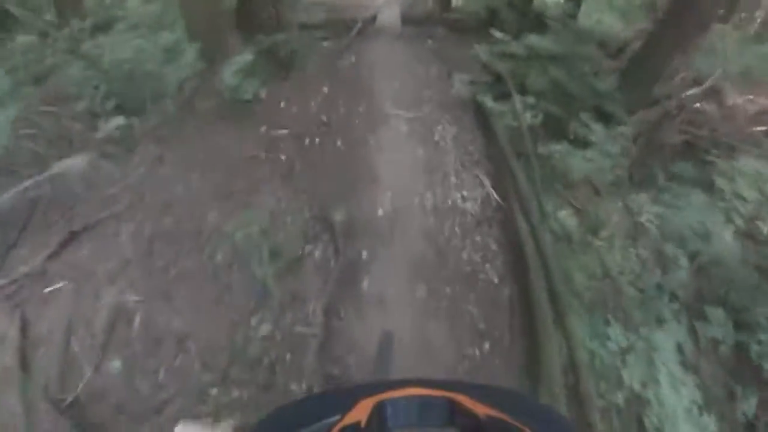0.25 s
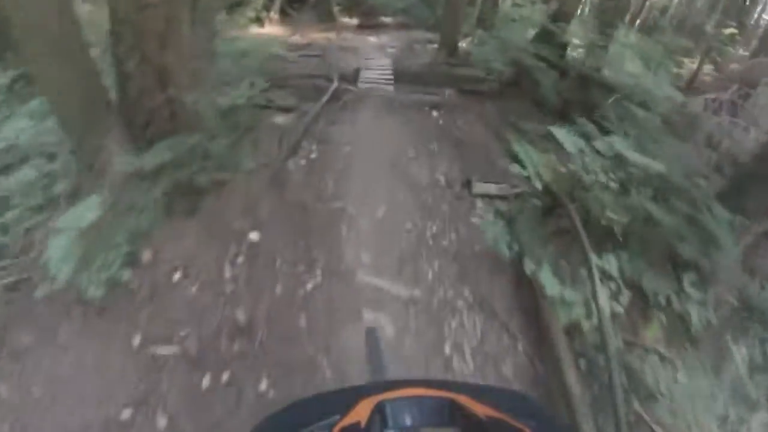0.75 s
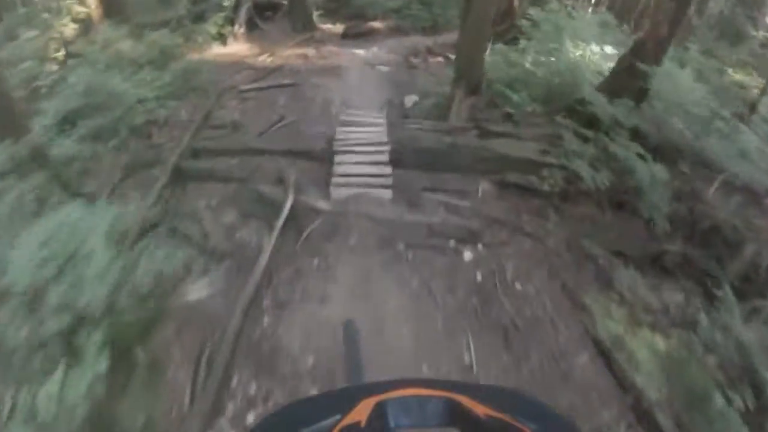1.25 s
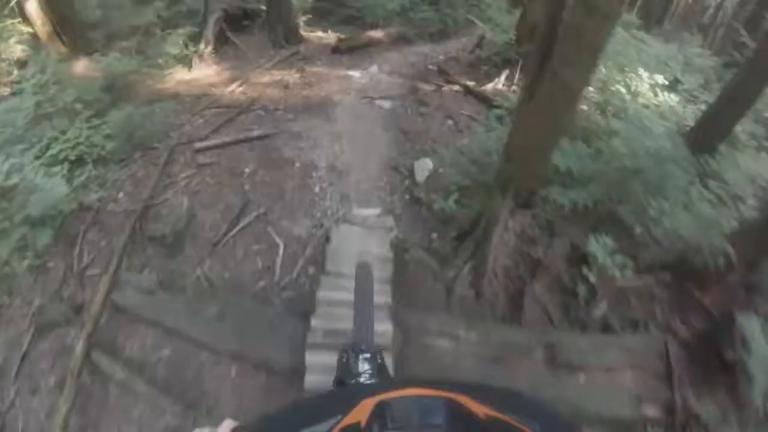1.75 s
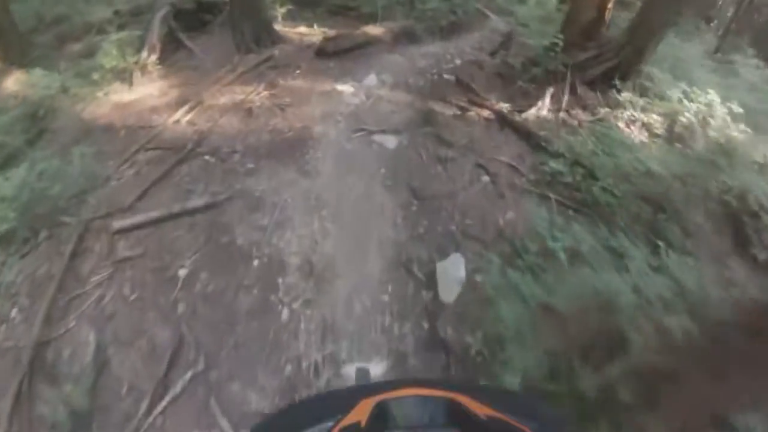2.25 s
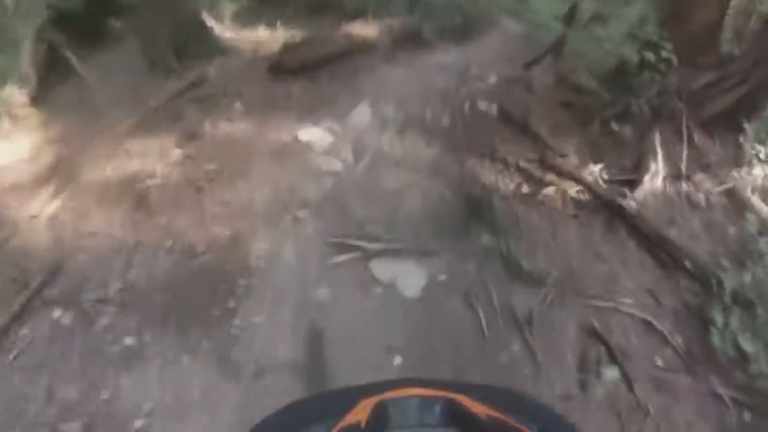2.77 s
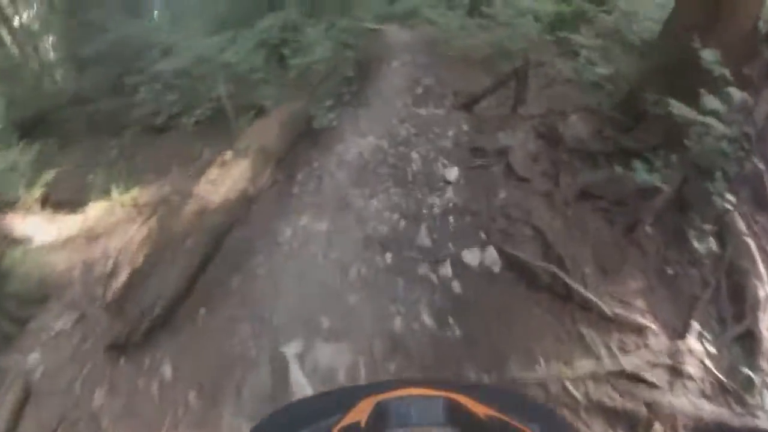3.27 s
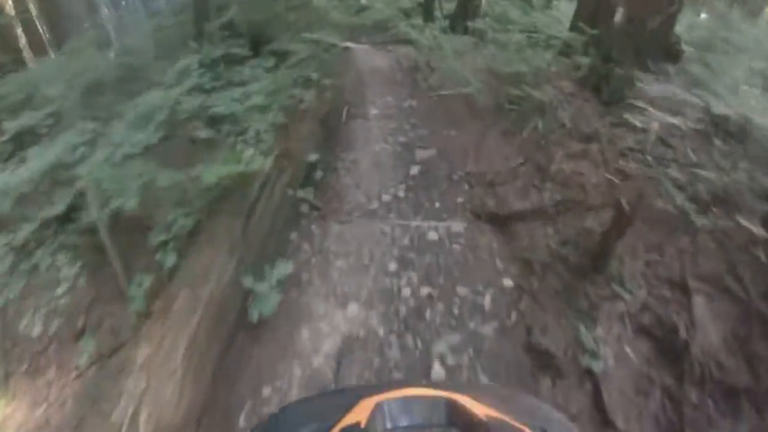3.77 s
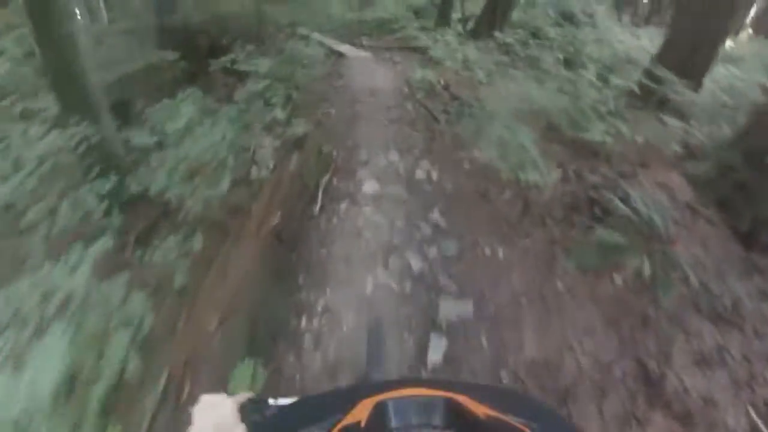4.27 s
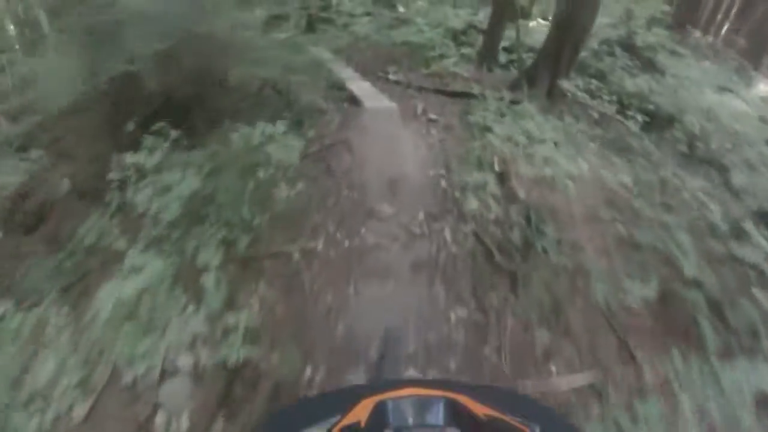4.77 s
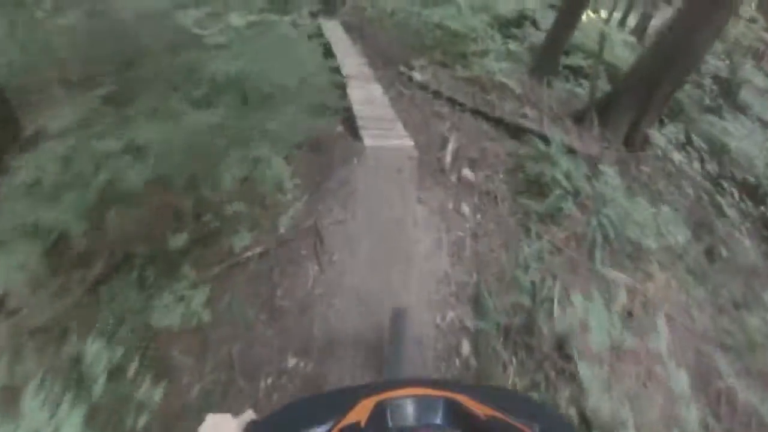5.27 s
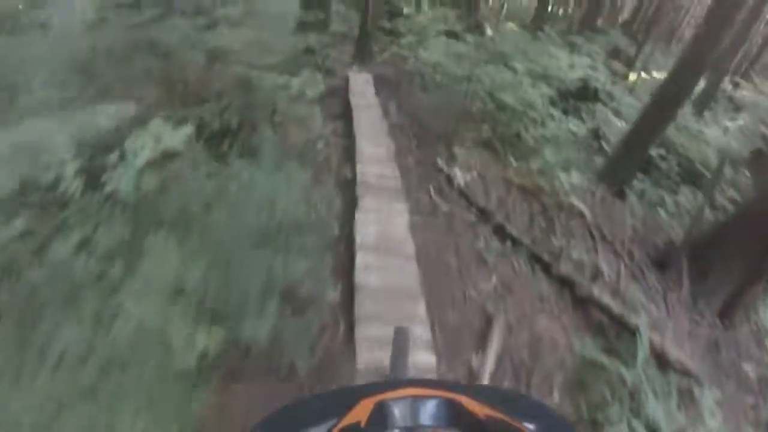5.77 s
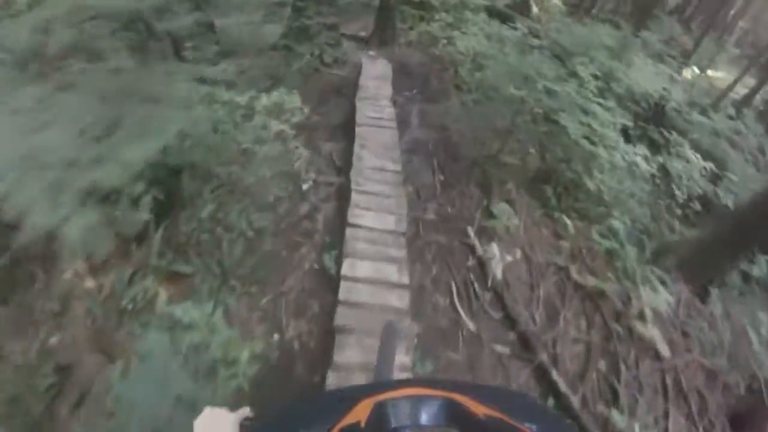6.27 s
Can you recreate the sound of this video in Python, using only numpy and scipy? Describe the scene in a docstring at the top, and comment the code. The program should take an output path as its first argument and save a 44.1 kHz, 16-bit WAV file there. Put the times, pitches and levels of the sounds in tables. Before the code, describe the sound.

Heard from a rider-mounted camera in a closed case, a mountain bike runs down a forest trail. Deep wind buffeting and soft hiss continue throughout. Early bumps thud dully with chain slaps and small ticks, then it calms over planks. A hard landing cracks sharply against the case, followed by a rattling burst of thumps and gritty tyre crunch, before quieter rolling with muffled knocks.

```python
"""A forest trail, ridden downhill on a mountain bike; one microphone in a closed camera case on the rider.
Behind the ride lie steady hiss and a faint whine, then filtered-noise wind that buffets the microphone.
Just below, tyres crunch as banded showers of tiny impacts; the chain slaps and small parts tick as noise bursts.
Closest, roots and rocks thump the springy mount as decaying cosines with a clunk of the frame,
and one hard landing cracks against the case, whose modes ring as decaying sines."""
import sys
import numpy as np
from scipy import signal
from scipy.fft import rfft, irfft, next_fast_len
from scipy.io import wavfile
from scipy.ndimage import uniform_filter1d

SR = 44100
rng = np.random.default_rng(int(sys.argv[2]) if len(sys.argv) > 2 else 0)


def put_to_file(sound):
    """Save the sound as 16-bit audio at rate SR, in the file named by the first command-line argument."""
    columns = np.atleast_2d(sound).T  # one column per channel
    safe = np.clip(columns, -1, 1)
    whole_steps = np.round(safe * 32767)
    wavfile.write(sys.argv[1], SR, whole_steps.astype(np.int16))


N = 287973
T = np.arange(N) / SR  # time [s]

# Levels in the tables are relative: each layer's filter and mix gain still follow.
# colour of the electronic hiss: (frequency [Hz], level [dB])
HISS_COLOUR = [(100, 16), (300, 15.5), (800, 7.5), (1700, 1), (3000, 3.5), (5000, 0), (6800, -1.5),
               (7200, 0.5), (7700, -2.5), (10500, -2.5), (12500, -5), (13300, -24.5), (16000, -24)]
# the ride between jolts: (time [s], wind buffeting [dB], trembling of the mount [dB])
RIDE = [(0, -39.5, -60), (.6, -44.5, -49), (.9, -55.5, -69.5), (1.25, -45.5, -67.5), (1.55, -51.5, -71),
        (2.05, -43, -73), (2.4, -43.5, -73.5), (2.6, -38, -52), (2.85, -36, -42), (3.06, -53.5, -60),
        (3.36, -38.5, -62.5), (3.75, -45, -65.5), (4.1, -59.5, -76.5), (4.5, -39.5, -65.5), (5.1, -45, -74),
        (5.75, -51, -74), (6.02, -58.5, -79), (6.53, -52, -73)]
# gusts that break into a rough flutter at the microphone: (time [s], flutter level [dB], half length [s])
GUSTS = [(0.295, -65.5, 0.055), (0.469, -61.5, 0.038), (0.546, -63.5, 0.011), (1.176, -76, 0.067),
         (1.731, -75.5, .035), (2.408, -69, 0.034), (2.517, -58.5, .02), (2.751, -59, 0.018),
         (2.865, -59.5, 0.032), (3.197, -75.5, 0.038), (3.437, -62, 0.012), (3.6, -69.5, 0.035),
         (4.475, -63, 0.026), (4.804, -65.5, 0.023), (5.797, -75.5, 0.021)]
# colours of the wind, the gust flutter and the trembling mount: (frequency [Hz], level [dB])
WIND_COLOUR = [(5, -7), (13, 3.5), (20, -3), (35, -14), (55, -21), (100, -34.5), (200, -52), (500, -68),
               (1500, -91.5)]
GUST_COLOUR = [(90, -10.5), (170, 9.5), (300, -2.5), (500, -5), (800, -8.5), (1050, -14), (2500, -23),
               (6000, -73)]
SHAKE_COLOUR = [(30, -17), (65, -5.5), (85, 11.5), (120, -11.5), (170, -22), (300, -33.5), (600, -40),
                (1000, -53.5), (3000, -77.5)]
# the ground under the tyres: (time [s], crunch level [dB])
GROUND = [(0, -76.5), (.3, -80), (.62, -77), (.85, -83.5), (1.3, -81), (2.38, -85.5), (2.5, -75),
          (2.76, -69), (2.9, -68), (3.04, -83), (3.42, -78.5), (3.6, -83.5), (3.98, -81), (4.18, -88),
          (4.4, -73), (4.76, -79), (5.05, -81), (5.65, -81), (6.25, -88), (6.53, -89.5)]
# colour of the tyre crunch: (frequency [Hz], level [dB])
TYRE_COLOUR = [(150, -10), (500, -10), (900, -1), (1150, -2.5), (1370, 4), (1700, -8.5), (2020, 2.5),
               (2350, 4.5), (2650, -2.5), (2850, -15.5), (3600, -18.5), (6000, -28), (12000, -47.5)]
# chain slaps and stones against the frame: (time [s], level [dB], pitch [Hz])
SLAPS = [(0.0569, -55.5, 2220), (0.1185, -58.5, 1300), (0.225, -54.5, 2010), (0.299, -62.5, 1290),
         (0.416, -59, 1940), (0.4478, -52.5, 1400), (0.595, -58, 2180), (0.69, -62, 2310),
         (1.0216, -54, 1540), (1.0898, -48, 1320), (1.2972, -60, 2630), (1.966, -57.5, 1360),
         (2.0804, -62.5, 1350), (2.1666, -65, 1240), (2.354, -59.5, 1490), (2.463, -61, 1370),
         (2.6894, -52.5, 1930), (2.721, -59, 1750), (2.7399, -47.5, 1830), (2.8452, -39, 1840),
         (2.9073, -58, 2240), (3.3204, -57.5, 1360), (3.439, -61, 1473), (3.574, -53.5, 1500),
         (3.8838, -55, 1840), (4.3345, -62.5, 1280), (4.424, -63, 1204), (4.659, -66.5, 2370),
         (5.2048, -59.5, 1300), (5.501, -60, 1400), (5.7363, -58, 2360), (5.9896, -66, 2270)]
# ticks of small loose parts: (time [s], level [dB])
TICKS = [(0.046, -59), (0.211, -58), (0.2803, -52.5), (0.4538, -55), (0.5194, -56.5), (0.5837, -63.5),
         (0.6976, -62.5), (0.771, -65.5), (1.3336, -62), (2.359, -57.5), (2.3997, -55), (2.4306, -60),
         (2.459, -66), (2.5414, -56.5), (2.6325, -51.5), (2.676, -64), (2.729, -54), (2.789, -54),
         (2.834, -58), (2.8968, -60), (2.9377, -62.5), (2.9835, -53), (3.3985, -59), (3.566, -60),
         (4.4321, -53.5), (4.4754, -59), (4.501, -63), (4.5872, -61), (5.4241, -60.5), (5.8436, -65),
         (6.4679, -63)]
# colours of the slaps and the ticks: (frequency [Hz], level [dB])
SLAP_COLOUR = [(300, -16), (750, -6.5), (1250, 3), (1650, -6.5), (2000, 1), (2550, 2), (2900, -15.5),
               (5000, -26), (12000, -37.5)]
TICK_COLOUR = [(1000, -17), (2800, -7.5), (3600, -1), (5000, -6.5), (5800, -5), (6550, 4), (7300, -9.5),
               (8100, -2), (9000, -6), (10300, 1), (12500, -15), (15000, -28.5)]
# hard blows on the case: (time [s], level [dB])
CRACKS = [(2.486, -38), (2.5029, 0), (2.512, -34), (2.52, -37)]
# modes of the case, and the ping of a metal fitting: (frequency [Hz], level [dB], 60 dB decay [s])
CASE_MODES = [(840, -28, .02), (1110, -13, .022), (1310, -7.5, 0.0067), (1653, -14, 0.017),
              (2250, -19.5, 0.024), (2590, -27.5, 0.027), (3150, -33, .015), (3450, -41, 0.028),
              (4320, -26, 0.018), (4740, -30.5, 0.019), (5430, -33.5, 0.01), (6350, -39.5, .012),
              (7200, -27, .007), (8700, -52, .005), (10300, -44, 0.0072)]
PING_MODES = [(4380, -46, .12), (4603, -50, .08), (4727, -54, .075)]
# jolts of the mount by roots, rocks and planks: (time [s], swing level [dB], contact time [ms])
JOLTS = [(0.024, -32.5, 2.66), (0.169, -44.5, 5.6), (0.208, -44, 3.7), (0.2622, -29, 1.9),
         (0.4413, -33.5, 1.56), (0.525, -36, 7.8), (0.63, -34, 8.6), (0.811, -50, 6.9), (1.088, -46.5, 2.9),
         (1.339, -44.5, 7.2), (1.876, -43.5, 4.7), (1.98, -52.5, 4.6), (2.363, -41, 2.45),
         (2.486, -32, 3.7), (2.503, -17, 8.7), (2.5172, -14, 2.13), (2.624, -33, 4.7), (2.6555, -32.5, 2.1),
         (2.742, -31, 3.8), (2.794, -41, 2.4), (2.8228, -20, 1.4), (2.846, -25, 3.45),
         (2.9294, -22.5, 2.03), (3.356, -45, 8.2), (3.436, -47, 3.8), (3.559, -43.5, 1.7),
         (3.58, -41.5, 4.2), (4.401, -45.5, 8.9), (4.465, -39.5, 3.1), (4.603, -45.5, 7), (4.665, -49, 5.8),
         (4.789, -34.5, 6.5), (5.098, -46, 8.5), (5.212, -45.5, 6.1), (5.421, -44.5, 3.7), (5.50, -51, 5),
         (5.587, -47.5, 8.3), (5.838, -48, 7)]
# swings of the mount and, slowest, of the rider's body: (frequency [Hz], level [dB], 60 dB decay [s])
MOUNT_MODES = [(82, 4, 0.17), (114, -18.5, 0.015), (30.4, -15.5, .13)]
# colour of the frame's clunk: (frequency [Hz], level [dB])
CLUNK_COLOUR = [(90, -19.5), (170, -3), (350, -0.5), (600, -3.5), (750, -20), (950, -17.5), (1500, -28.5),
                (2400, -31.5), (2900, -38), (3550, -30), (4300, -42), (7000, -52), (12000, -68)]

WHINE_HZ, TOP_HZ = 3596, 15500
GUST_PRESSURE_DB = 35  # slow pressure over flutter
LOAD_RISE_S, LOAD_FALL_S = .057, .065  # load on the bike builds before each jolt and eases after it
LOAD_GROWTH = .6  # dB of load per dB of swing
LOAD_WIND_DB, LOAD_SHAKE_DB, LOAD_CRUNCH_DB = -21, -26.5, -62  # what a load of 1 adds
GRIT_DB, GRIT_FROM_DB, GRIT_GROWTH = -83.5, -68, 1.2  # grit at a given crunch; dB of grit per dB of crunch
CLUNK_DB, CLUNK_DB_PER_DOUBLING = 15, -7.5  # over swing at 1 ms contact; change per doubling of contact


def undb(db):
    """Decibels to gain."""
    return 10 ** (np.asarray(db) / 20)


def unit(x):
    """Scale to rms 1."""
    return x / np.sqrt(np.mean(x ** 2))


def curve(table, axis=1):
    """One column of a table, joined by straight lines in time."""
    rows = np.array(table)
    return np.interp(T, rows[:, 0], rows[:, axis])


def fade(t, t60):
    """Free decay, 60 dB down after t60 seconds."""
    return np.exp(-np.log(1000) * t / t60)


def swell(s, db, half):
    """A smooth rise and fall around time s, down to 1/e after half seconds either way."""
    return undb(db) * np.exp(-((T - s) / half) ** 2)


def add(track, s, sound):
    """Mix a sound into the track from time s on."""
    start = max(int(s * SR), 0)
    part = track[start:start + len(sound)]
    part += sound[:len(part)]


def band(x, low_hz, high_hz):
    """Band-pass between two edges."""
    edges = [low_hz, min(high_hz, SR / 2 - 1)]
    return signal.sosfilt(signal.butter(2, edges, "band", fs=SR, output="sos"), x)


def colour(x, points):
    """Causal minimum-phase filter through (Hz, dB) points; white noise keeps its power."""
    size = 2 * next_fast_len(N // 2 + SR)
    hz, db = np.transpose(points)
    bin_hz = np.arange(size // 2 + 1) * SR / size
    gain = unit(undb(np.interp(np.log(bin_hz + 1), np.log(hz), db)))
    # folding the cepstrum to positive times makes the filter causal
    cepstrum = irfft(np.log(gain))[:size // 2]
    cepstrum[0] /= 2
    response = np.exp(rfft(2 * cepstrum, size))
    return irfft(rfft(x, size) * response)[:N]


def noise(points):
    """Coloured noise of rms 1."""
    return unit(colour(rng.standard_normal(N), points))


def steady(x, size):
    """Even out the slow swells of a noise over size samples."""
    power = uniform_filter1d(uniform_filter1d(x ** 2, size), size)
    return x / np.sqrt(power + 1e-9)


def walk(rate):
    """Random levels held 1 / rate seconds and smoothed twice; rms 1."""
    k = int(SR / rate)
    steps = np.repeat(rng.standard_normal(N // k + 1), k)
    return unit(uniform_filter1d(uniform_filter1d(steps, k), k)[:N])


def grains(rate, spread_db):
    """Random tiny impacts, rate a second on average, their sizes spread by an exponential draw; rms 1."""
    hit = rng.random(N) < rate / SR
    strength = rng.standard_normal(N)
    return unit(hit * strength * undb(spread_db * np.minimum(rng.exponential(size=N), 4)))


def blow(t60, edge_db, tail_db, tail_t60):
    """One sharp contact, then a brief chatter of smaller ones with a weak, longer tail; energy 1."""
    t = T[:SR // 4]
    envelope = fade(t, t60) + undb(tail_db) * fade(t, tail_t60)
    force = unit(envelope * rng.standard_normal(len(t)))
    force[0] = -undb(edge_db) * np.sqrt(len(t))  # edge energy relative to the chatter
    return force / np.linalg.norm(force)


def bursts(events, t60, edge_db, tail_db, tail_t60):
    """A blow for each (s, dB)."""
    out = np.zeros(N)
    for s, db in events:
        add(out, s, undb(db) * blow(t60, edge_db, tail_db, tail_t60))
    return out


def modes(table, t):
    """Modes struck together ring as decaying sines, their signs alternating."""
    ring = np.zeros(len(t))
    for k, (hz, db, t60) in enumerate(table):
        ring += (-1) ** (k + 1) * undb(db) * np.sin(2 * np.pi * hz * t) * fade(t, t60)
    return ring


def load():
    """Weight pressed onto the bike swells around each jolt, more for the harder ones."""
    power = np.zeros(N)
    for s, db, _ in JOLTS:
        away = np.maximum((s - T) / LOAD_RISE_S, (T - s) / LOAD_FALL_S)
        power += (undb(LOAD_GROWTH * db) * np.exp(-np.minimum(away, 20))) ** 2
    return np.sqrt(power)


def electronics():
    """The camera's own hiss, and a faint whine with its octave."""
    phase = 2 * np.pi * WHINE_HZ * T
    whine = undb(-96.0) * np.sin(phase) + undb(-97.0) * np.sin(2 * phase)
    return undb(-79.5) * noise(HISS_COLOUR) + whine


def wind(weight):
    """Slow eddies press on the microphone, harder as the rider lurches; gusts add pressure and flutter."""
    gusts = sum(swell(*gust) for gust in GUSTS)
    buffeting = undb(curve(RIDE, axis=1))
    lurch = undb(LOAD_WIND_DB) * weight
    gust_pressure = undb(GUST_PRESSURE_DB) * gusts
    pressure = np.sqrt(buffeting ** 2 + lurch ** 2 + gust_pressure ** 2)
    return steady(noise(WIND_COLOUR), size=3000) * pressure + noise(GUST_COLOUR) * gusts


def tremble(weight):
    """The trail keeps the mount trembling as low noise, which grows with the square of the load."""
    unrest = undb(curve(RIDE, axis=2) + 0.5 + 2.0 * walk(rate=8))
    level = np.hypot(unrest, undb(LOAD_SHAKE_DB) * weight ** 2)
    return steady(noise(SHAKE_COLOUR), size=3000) * level


def tyres(weight):
    """Knobs crush dirt and pebbles, each size scuffing in its own band, harder under load; grit sprays."""
    edges = np.geomspace(100, 12000, num=25)
    patches = np.zeros(N)
    for low_hz, high_hz in zip(edges, edges[1:]):
        scuff = band(grains(rate=1500, spread_db=2), low_hz, high_hz)
        patches += scuff * undb(3 * walk(rate=60))
    stones = grains(rate=230, spread_db=4.0)
    texture = unit(colour(unit(patches) + undb(-7.5) * stones, TYRE_COLOUR))
    ground_db = curve(GROUND)
    pressure = np.hypot(undb(ground_db + 0.82), undb(LOAD_CRUNCH_DB) * weight)
    crunch = texture * pressure * undb(2.2 * walk(rate=50))
    grit_colour = [(1500, -10.0), (3500, 5.5), (6500, 6.5), (9000, -3), (14000, -17.5)]  # (Hz, dB)
    grit = colour(grains(rate=1500, spread_db=-1.0), grit_colour)
    spray = swell(s=2.843, db=-71.5, half=0.016)  # on the roughest bump
    return crunch + grit * (undb(GRIT_DB + GRIT_GROWTH * (ground_db - GRIT_FROM_DB)) + spray)


def slaps():
    """The chain and stones hit the frame: dull noise blows, pitched by where they strike."""
    out = np.zeros(N)
    for s, db, hz in SLAPS:
        hit = blow(t60=.026, edge_db=-9.5, tail_db=-9, tail_t60=0.087)
        slap = band(hit, hz / 1.7, hz * 1.3)
        add(out, s, undb(db) * slap / np.linalg.norm(slap))
    return undb(5.5) * colour(out, SLAP_COLOUR)


def ticks():
    """Small loose parts knock as thin, bright, very short noise blows."""
    hits = bursts(TICKS, t60=0.0099, edge_db=-15.5, tail_db=-17.0, tail_t60=.025)
    return undb(10.5) * colour(hits, TICK_COLOUR)


def cracks():
    """The landing knocks the case: its modes ring, a fitting pings and the bike rattles briefly."""
    rings = np.zeros(N)
    ring = modes(CASE_MODES + PING_MODES, T[:SR // 4])
    for s, db in CRACKS:
        add(rings, s, undb(db) * ring)
    rattle = colour(bursts(CRACKS, t60=0.038, edge_db=-19, tail_db=-10.5, tail_t60=0.14), SLAP_COLOUR)
    return band(rings, low_hz=300, high_hz=10300) + undb(-7.5) * band(rattle, low_hz=200, high_hz=9000)


def jolts():
    """Each bump shoves the mount, which swings on; short, hard contacts clunk more through the frame."""
    swing, clunks, t = np.zeros(N), np.zeros(N), T[:SR // 3]
    ring = sum(-undb(db) * np.cos(2 * np.pi * hz * t) * fade(t, t60) for hz, db, t60 in MOUNT_MODES)
    mount_hz = MOUNT_MODES[0][0]
    for s, db, contact_ms in JOLTS:
        # the force builds over the contact time and lets go as slowly
        push = np.sin(np.pi * np.minimum(t * 10 ** 3 / contact_ms / 2, 1)) ** 2
        # its strength is taken at the mount's own pitch
        push /= abs(np.sum(push * np.exp(2j * np.pi * mount_hz * t)))
        add(swing, s, undb(db) * signal.fftconvolve(push, ring)[:len(t)])
        # a soft contact weakens the clunk and spreads it into a scuff
        clunk_db = db + CLUNK_DB + CLUNK_DB_PER_DOUBLING * np.log2(contact_ms)
        clunk = blow(t60=.012 * contact_ms, edge_db=11 - 3.5 * contact_ms, tail_db=-19.5, tail_t60=0.19)
        add(clunks, s, undb(clunk_db) * clunk)
    return swing + colour(clunks, CLUNK_COLOUR)


def scene():
    """Everything as it reaches the single microphone, from the background to the jolts."""
    weight = load()
    background = electronics() + wind(weight) + tremble(weight)
    bike = tyres(weight) + slaps() + ticks()
    return (background + bike + cracks() + jolts())[None]


def record(dry):
    """The camera cuts the top with a steep low-pass."""
    return signal.sosfilt(signal.ellip(8, .2, 70, TOP_HZ, fs=SR, output="sos"), dry)


dry = scene()
out = record(dry)
put_to_file(out)
```